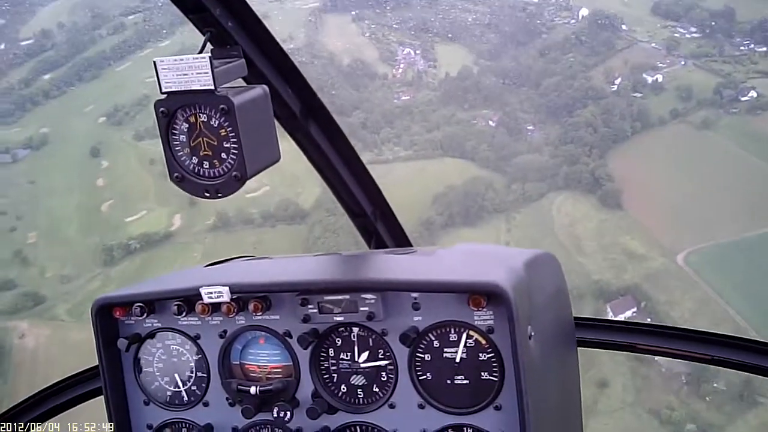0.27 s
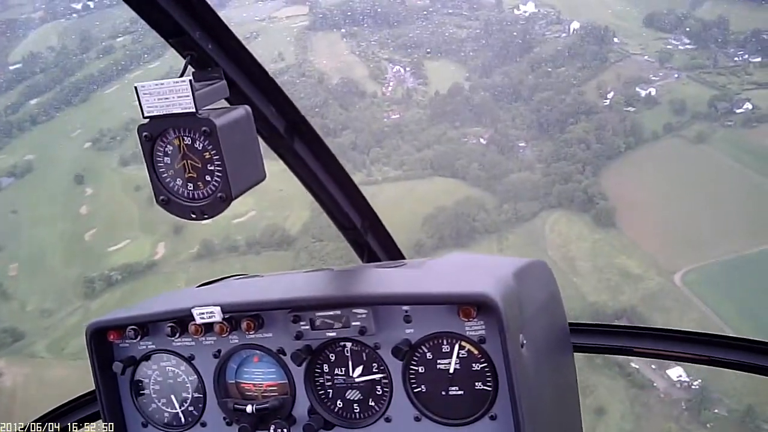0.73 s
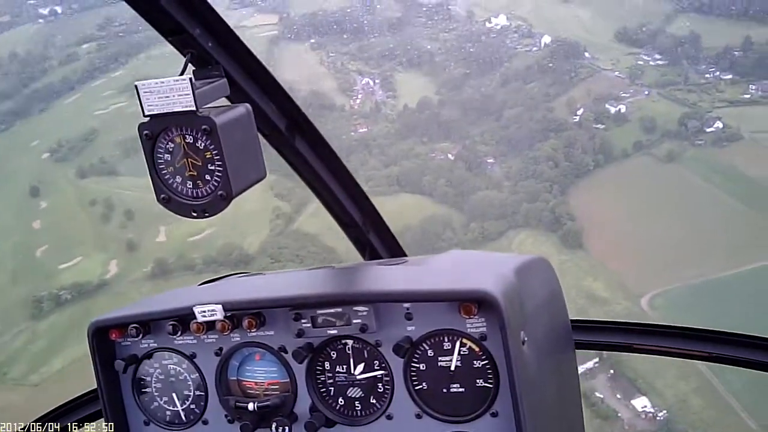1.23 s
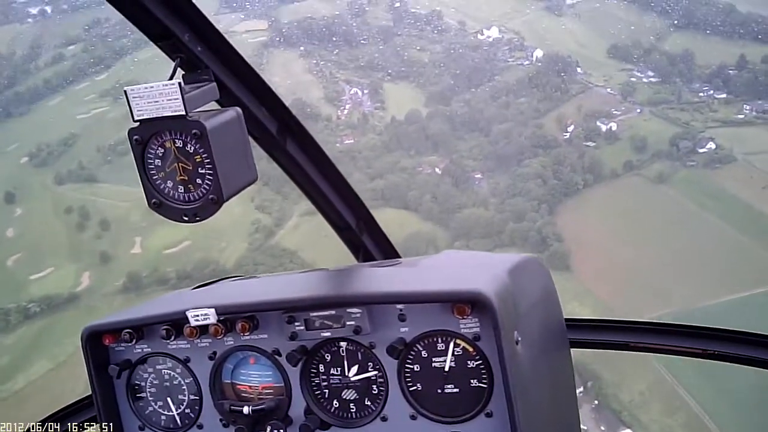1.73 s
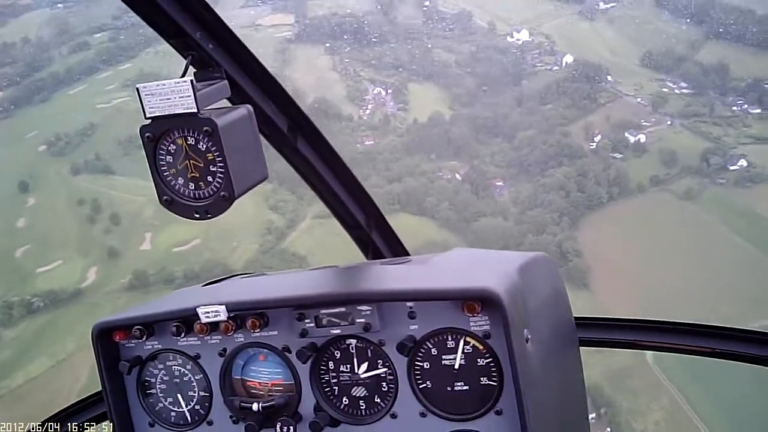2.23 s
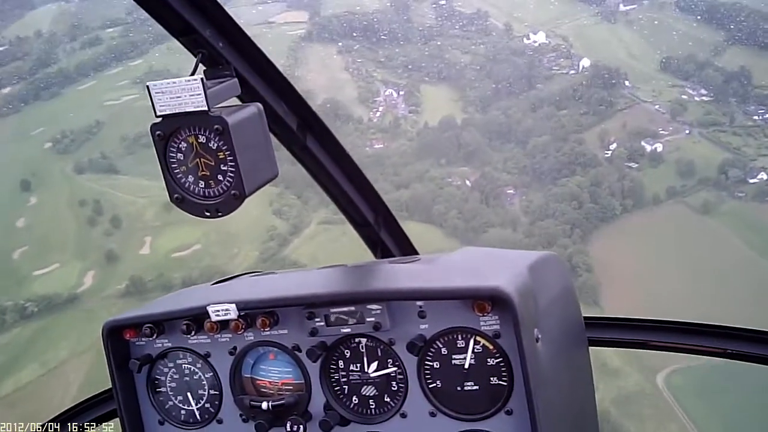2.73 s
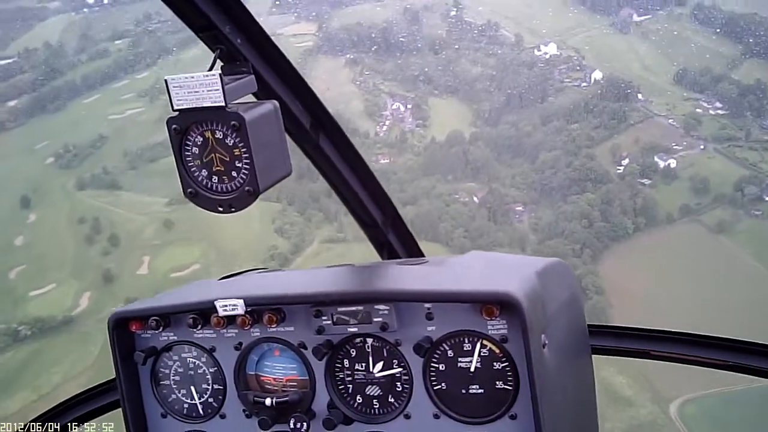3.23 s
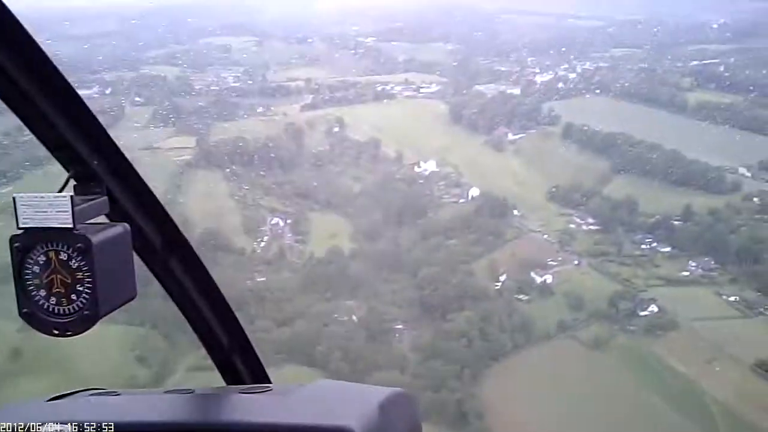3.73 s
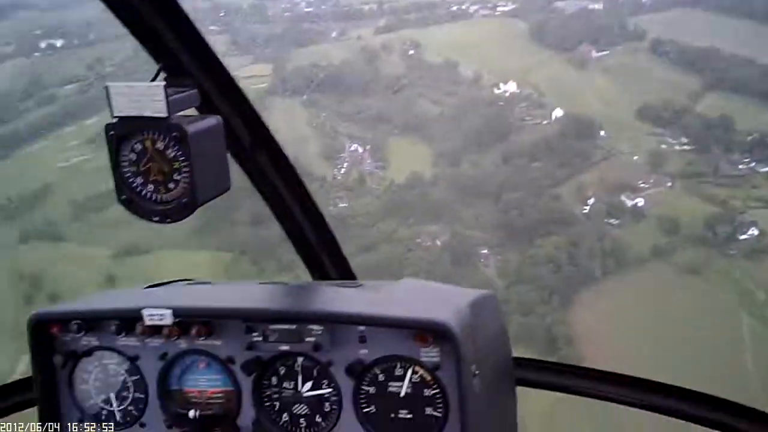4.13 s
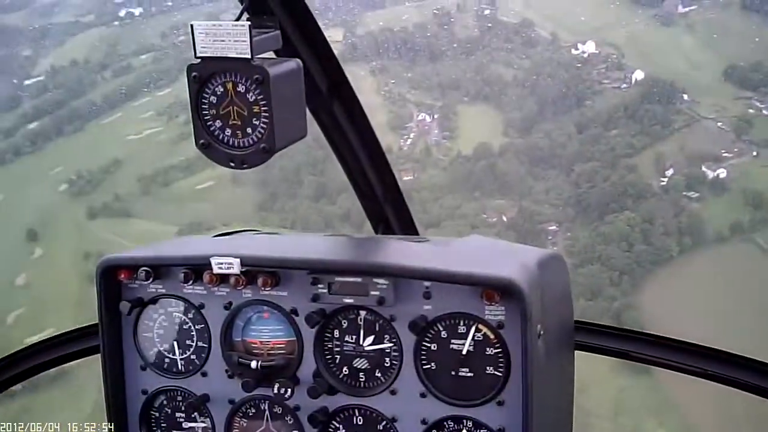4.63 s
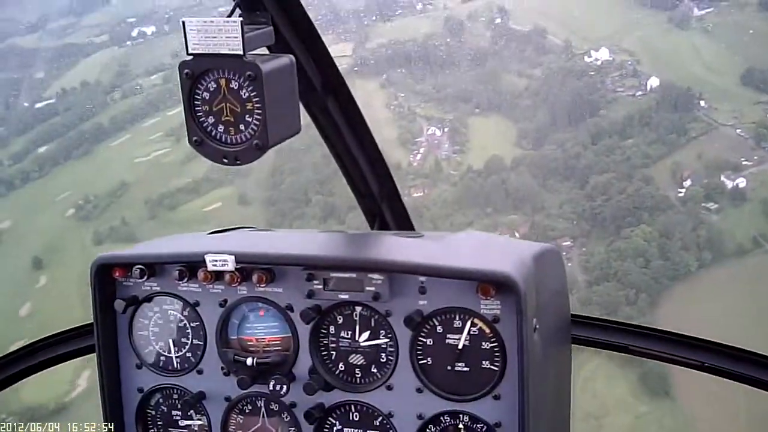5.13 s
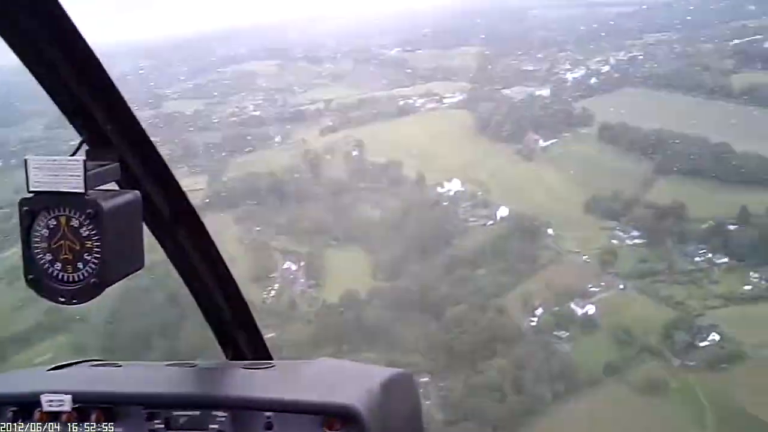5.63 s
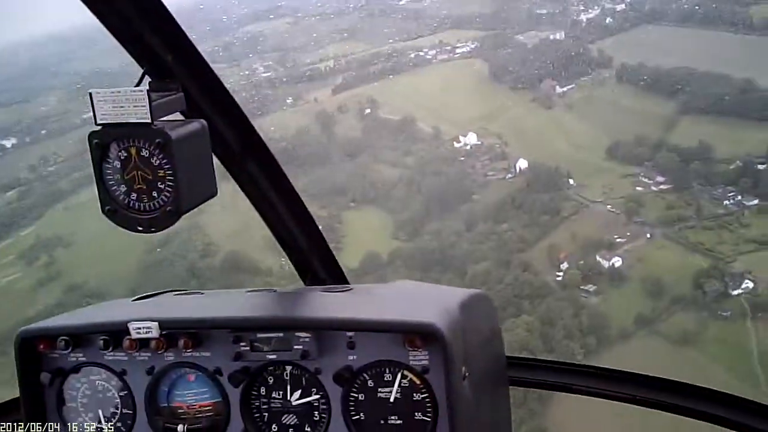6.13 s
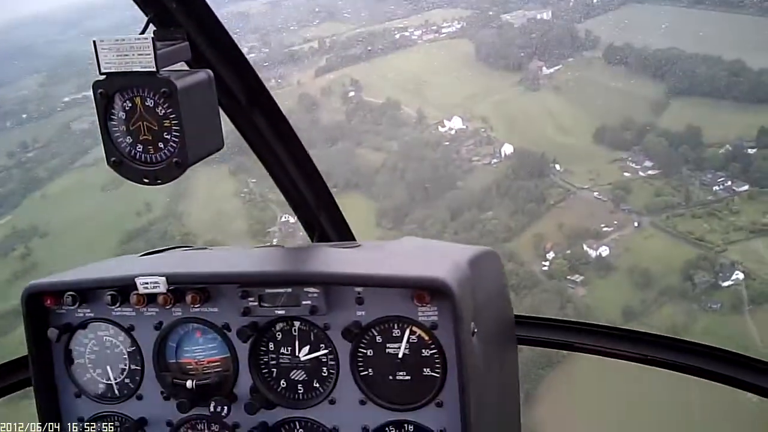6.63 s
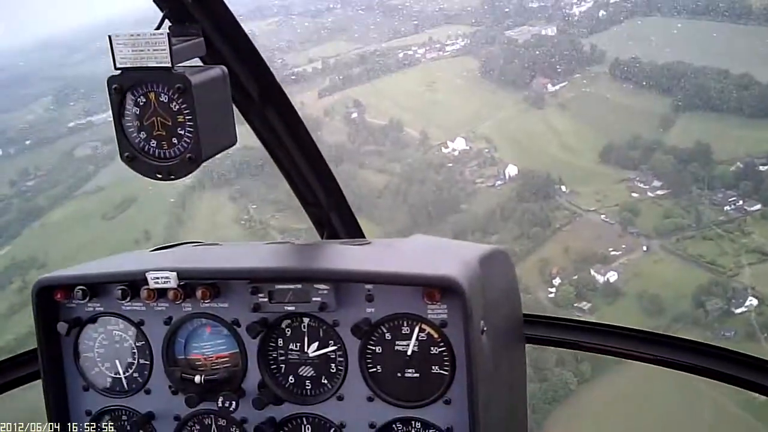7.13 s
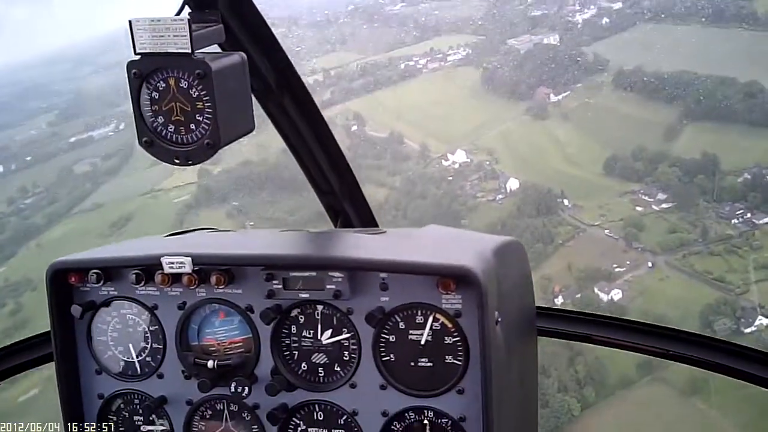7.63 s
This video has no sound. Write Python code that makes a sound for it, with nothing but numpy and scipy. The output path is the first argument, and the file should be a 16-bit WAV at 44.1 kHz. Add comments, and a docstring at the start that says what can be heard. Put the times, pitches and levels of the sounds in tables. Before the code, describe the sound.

A piston helicopter drones continuously from start to finish, already running and never stopping. The dominant hum is around a hundred hertz, beating quickly, with a rough muffled roar, fine mechanical buzz and a fluttering low rotor beneath. Faint steady whines from gears and soft slipstream hiss lie on top. Rare faint clicks come from something loose. The sound is enclosed and dense, picked up by a handheld microphone in the cockpit.

```python
"""Inside a cruising light helicopter

The four-cylinder engine hums at its firing rate and throbs against the slightly slower tail rotor blades.
Gears add thin whines and the main rotor flutters underneath: all are sums of tones from one drive train.
Engine roar and slipstream are shaped noise that pulses with the engine. A few faint ticks come from something
loose. The listener moves from ahead to the right, then sinks a little, which changes some of the levels."""
import sys
import numpy as np
from scipy import signal
from scipy.fft import rfft, irfft
from scipy.io import wavfile

SR = 44100
rng = np.random.default_rng(int(sys.argv[2]) if len(sys.argv) > 2 else 0)


def persist_wave(psi):
    """Save psi, clipped to +-1, as 16-bit WAV."""
    counts = np.round(np.clip(psi, -1, 1) * 32767).astype(np.int16)
    wavfile.write(sys.argv[1], SR, np.atleast_2d(counts).T)


N = 347508
TIME = np.arange(N) / SR  # seconds
BINS = np.fft.rfftfreq(N, 1 / SR)  # Hz

# engine speed; one cycle is two crank turns and four firings: t/s, engine cycles per second
ENGINE_SPEED = [(0.0, 26.134), (0.5, 26.161), (1.0, 26.191), (1.5, 26.142), (2.0, 26.118), (2.5, 26.148),
                (3.0, 26.166), (3.5, 26.192), (4.0, 26.209), (4.5, 26.234), (5.0, 26.248), (5.5, 26.306),
                (6.0, 26.329), (6.5, 26.307), (7.0, 26.337), (7.5, 26.348), (7.88, 26.352)]
# tones of the uneven cylinders: multiple of the engine cycle rate, level/dB
UNEVEN_TONES = [(1, -38), (2, -43.5), (3, -55.5), (5, -27), (6, -26.5), (7, -33.5), (9, -36.5), (10, -40),
                (11, -34), (13, -38.5), (14, -40), (15, -37), (17, -44.5), (18, -40), (19, -55),
                (20, -41.5), (21, -42), (23, -43.5), (24, -44.5), (27, -37.5), (28, -48), (29, -48),
                (32, -48), (46, -47), (48, -48.5), (58, -45), (66, -49.5), (75, -52.5)]
FIRINGS = 4  # per engine cycle
# a moment when a firing and a tail blade arrive together, at the top of a throb
THROB_S = 4.048


def gain_of(db):
    """Turn decibels into an amplitude factor."""
    return 10 ** (np.asarray(db) / 20)


def curves(rows):
    """Draw each column of a time table as a line with a value at every sample."""
    s, *columns = np.transpose(rows)
    return [np.interp(TIME, s, column) for column in columns]


def read(points, hz):
    """Read a spectrum whose points are joined by straight lines over log frequency."""
    f, value = np.transpose(points)
    return np.interp(np.log(hz + 1), np.log(f + 1), value)


def drift(rate_hz, size=2048):
    """Smooth random wandering of unit spread, mostly slower than rate_hz."""
    f = np.arange(size // 2 + 1) * SR / N
    slowing = (f > 0) / (1 + (f / rate_hz) ** 2)
    slow = irfft(rfft(rng.standard_normal(size)) * slowing)
    return np.interp(TIME, np.linspace(0, TIME[-1], size), slow / slow.std())


def noise(spectrum, bumps):
    """Noise with a given level per Hz, shaped further by a few broad resonances."""
    db = read(spectrum, BINS)
    for f, width, bump_db in bumps:
        db = db + bump_db / (1 + (2 * (BINS - f) / width) ** 2)
    white = rfft(rng.standard_normal(N))
    return irfft(white * gain_of(db), N) * np.sqrt(SR / 2)


def tone(turns, db, unrest, rate_hz):
    """One tone of rms level db, lowest on whole turns, wavering in strength and phase."""
    angle = 2 * np.pi * turns
    sideways = unrest * drift(rate_hz) * np.sin(angle)
    steady = (1 + unrest * drift(rate_hz)) * np.cos(angle)
    return gain_of(db) * (sideways - steady) * np.sqrt(2 / (1 + 2 * unrest ** 2))


def placed(levels_db):
    """Standing waves in the cabin make a sound's level depend on where the listener is."""
    # the listener's path: t/s, position (0 = ahead, 1 = right, 2 = lowered)
    path = [(3.25, 0), (3.65, 1), (6.1, 1), (6.7, 2)]
    position, = curves(path)
    return np.interp(position, np.arange(len(levels_db)), levels_db)


def pulsing(cycles, firing, lope):
    """A gain that swells with each firing, and more strongly at one firing in each engine cycle."""
    angle = 2 * np.pi * cycles
    uneven = np.cos(angle) + np.cos((FIRINGS - 1) * angle)
    return 1 + firing * np.cos(FIRINGS * angle) + lope * uneven


def slipstream(cycles):
    """Air hisses at the canopy and door seals, shaken by the engine and by turbulence."""
    # rushing air, before the changes below: f/Hz, level/dB per Hz
    air = [(1000, -85), (2600, -80), (3300, -83), (4600, -84.5), (6300, -88), (7200, -93), (8200, -95),
           (8800, -101.5), (10500, -99.5), (11400, -104.5), (12700, -106), (13500, -103.5), (14700, -103.5),
           (15600, -108)]
    # colouring by the door gaps: f/Hz, width/Hz, boost/dB
    gaps = [(3980, 490, 5), (5010, 300, 3.5), (5950, 300, 2)]
    # level change by position: ahead/dB, right/dB, lowered/dB
    airflow = (-.4, .3, 0)
    # one stronger gust on the canopy
    gust_s, gust_length_s, gust_db = 4.4, .35, 0.9
    gust = gust_db * np.exp(-((TIME - gust_s) / gust_length_s) ** 2)
    turbulence = 0.6 * drift(rate_hz=38)
    flow_db = placed(airflow) + gust + turbulence
    return noise(air, gaps) * gain_of(flow_db) * pulsing(cycles, firing=0.096, lope=0.029)


def roar(cycles):
    """Rough engine, rotor and cooling-fan noise, dulled by the cabin wall."""
    # noise through the wall, before pulsing: f/Hz, level/dB per Hz
    wall_noise = [(8, -71), (19, -66.5), (30, -50), (41, -56.5), (65, -49), (115, -47.5), (175, -48),
                  (230, -53), (300, -51), (420, -57), (900, -61), (1300, -66), (1800, -63), (2300, -74),
                  (3200, -115.5)]
    # hollow resonances of the cabin: f/Hz, width/Hz, boost or cut/dB
    cabin = [(564, 23, 2.5), (578, 42, -7.5), (684, 70, 2.5), (1440, 160, 3.5)]
    buffeting_db = .35 * drift(rate_hz=27)
    return noise(wall_noise, cabin) * gain_of(buffeting_db) * pulsing(cycles, firing=.19, lope=0.079)


def ticks():
    """Something loose in the cabin ticks: short tones that swell and fade at once."""
    # the ticks: middle t/s, f/Hz, level at the top of the swell/dB, half of the length/s
    tick_list = [(1.289, 6000, -31, .0004), (1.617, 8350, -52, .006), (2.079, 4970, -34, .0005),
                 (2.448, 8330, -53, .006), (2.538, 8330, -51, .007), (4.49, 4100, -30, 0.0017)]
    sound = np.zeros(N)
    for s, hz, db, half_length in tick_list:
        near = abs(TIME - s) < half_length
        t = TIME[near] - s
        swell = np.cos(np.pi / 2 * t / half_length) ** 2
        sound[near] += gain_of(db) * swell * np.sin(2 * np.pi * hz * t)
    return sound


def gears(cycles):
    """Meshing teeth whine at their passing rate and its multiples, fluttering as their load shifts."""
    # steadily placed main gear tones: multiple of the tooth rate, level/dB
    main_tones = [(1, -49.5), (2, -47), (4, -42.5), (7, -63), (11, -70)]
    # rows: main gear times 3, main gear times 5, tail gear, tail gear times 2
    # columns: level ahead/dB, level right/dB, level lowered/dB
    whines = [(-39, -45, -43.5), (-35, -37.5, -37), (-51, -44, -46), (-47.5, -45, -45.5)]
    # tooth passes per engine cycle, set by the gearing
    main_teeth, tail_teeth = 14.2264, 40.0925
    mesh, tail_mesh = main_teeth * cycles, tail_teeth * cycles
    third_db, fifth_db, tail_db, octave_db = (placed(levels) for levels in whines)

    main = tone(5 * mesh, fifth_db, unrest=.2, rate_hz=3.3)
    main += tone(3 * mesh, third_db, unrest=0.38, rate_hz=2.8)
    for k, db in main_tones:
        main += tone(round(k) * mesh + rng.random(), db, unrest=0.36, rate_hz=7.5)

    tail = tone(tail_mesh, tail_db, unrest=0.25, rate_hz=5)
    tail += tone(2 * tail_mesh, octave_db, unrest=0.31, rate_hz=8.6)
    return main + tail


def rotors(cycles):
    """Passing blades make tones; the tail rotor beats with the hum almost five times a second."""
    # tail rotor tones: multiple of the blade rate, level/dB
    tail_tones = [(1, -29.5), (2, -30.5), (3, -33.5), (4, -60), (5, -45), (8, -55)]
    # main rotor tones: multiple of the blade rate, level/dB
    main_tones = [(1, -35.5), (2, -40.5), (3, -53), (4, -45)]
    # blade passes per engine cycle, set by the gearing
    tail_blades, main_blades = 3.8183, .8712
    sound = np.zeros(N)
    for k, db in tail_tones:
        sound += tone(round(k) * tail_blades * cycles, db, unrest=0.13, rate_hz=2.0)
    for k, db in main_tones:
        sound += tone(round(k) * main_blades * cycles + rng.random(), db, unrest=0.25, rate_hz=2)
    return sound


def buzz(cycles, scatter_db=3.5, order=136, size=8192):
    """Valve gear and exhaust repeat a fine rasp once per engine cycle."""
    # weaker engine multiples, before random scatter: f/Hz, level of each/dB
    weak_levels = [(550, -49), (900, -56.5), (1100, -50.5), (1400, -60), (1800, -59.5), (2200, -67),
                   (2700, -68), (3600, -82)]
    k = np.arange(order)
    mean_speed = np.mean(ENGINE_SPEED, 0)[1]
    db = read(weak_levels, k * mean_speed) + scatter_db * rng.standard_normal(order)
    # leave out the low multiples and those that the engine already plays
    weak = (k > 21) & ~np.isin(k, np.round(np.transpose(UNEVEN_TONES)[0]))
    phases = np.exp(2j * np.pi * rng.random(order))
    rasp = irfft(weak * gain_of(db) * phases, size) * size / np.sqrt(2)
    # replay this one-cycle waveform with slightly unsteady timing
    place = (cycles + .0012 * drift(rate_hz=4.4)) % 1
    return np.interp(place, np.arange(size) / size, rasp)


def engine(cycles):
    """Regular firing makes a strong hum; differences between cylinders add a lumpy drone."""
    # hum: multiple of the firing rate, slow wander/dB, level ahead/dB, level right/dB, level lowered/dB
    firing_tones = [(1, 0.2, -15, -14.5, -14.5), (2, 1, -32.5, -29.5, -32.5), (3, 0.74, -30, -30.5, -30),
                    (4, 1.0, -34.5, -36.5, -41)]
    # wavering as a share of the amplitude; the firing share grows with the multiple
    firing_unrest, uneven_unrest = 0.012, 0.13
    # the strongest cylinder fires this share of an engine cycle after the top of the throb
    strong_lag = .55

    partials = []
    for k, wander_db, *levels in firing_tones:
        level_db = placed(levels) + wander_db * drift(rate_hz=0.96)
        partials.append((FIRINGS * round(k), level_db, firing_unrest * round(k)))
    for k, db in UNEVEN_TONES:
        partials.append((round(k), db, uneven_unrest))

    sound = np.zeros(N)
    for k, db, unrest in partials:
        # multiples next to the hum swell it once per cycle; cabin echoes scramble those further off
        offset = k - FIRINGS
        lag = strong_lag * offset + .025 * offset ** 2 * rng.uniform(-1, 1)
        sound += tone(k * cycles - lag, db, unrest, rate_hz=1.6)
    return sound


def scene():
    """One drive train turns everything, so all its tones rise and fall in pitch together."""
    speed, = curves(ENGINE_SPEED)
    cycles = np.cumsum(speed) / SR
    cycles -= np.interp(THROB_S, TIME, cycles)  # counted from the top of a throb
    background = slipstream(cycles) + roar(cycles) + ticks()
    machine = gears(cycles) + rotors(cycles) + buzz(cycles) + engine(cycles)
    return (background + machine)[None]


def record(dry):
    """The microphone's band limit: a steep filter removes the highest treble."""
    edge_hz = 15720
    low_pass = signal.firwin(801, edge_hz, window=("kaiser", 9), fs=SR)
    return signal.oaconvolve(dry, low_pass[None], "same")


dry = scene()
out = record(dry)
persist_wave(out)
```